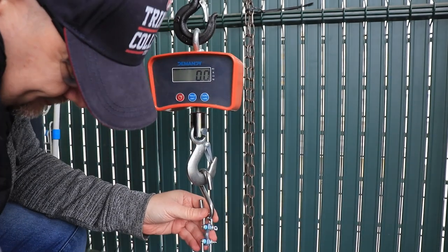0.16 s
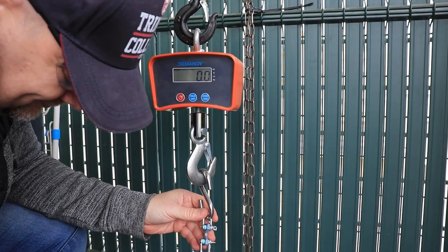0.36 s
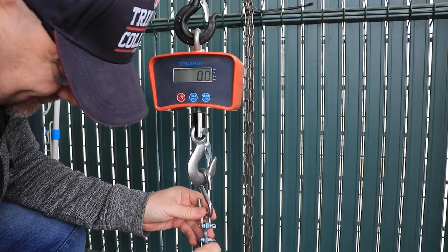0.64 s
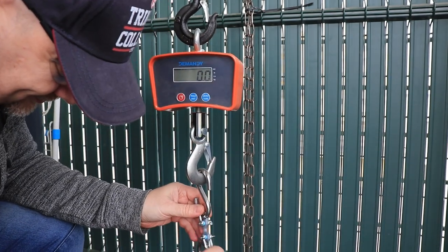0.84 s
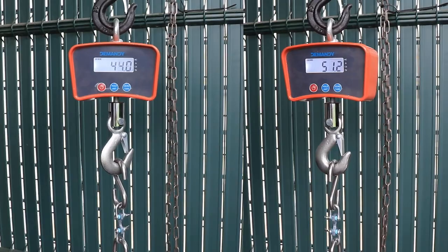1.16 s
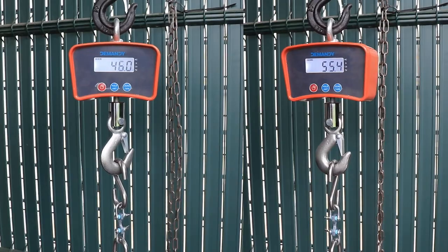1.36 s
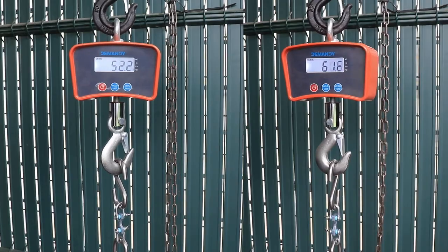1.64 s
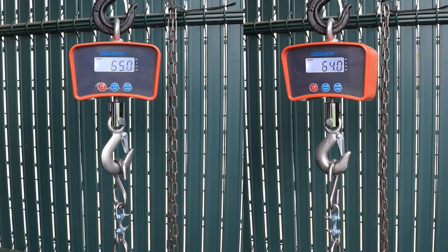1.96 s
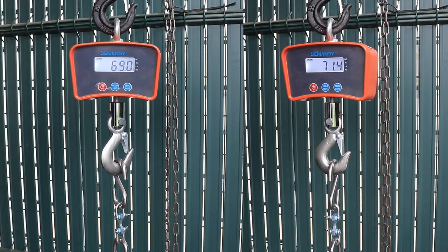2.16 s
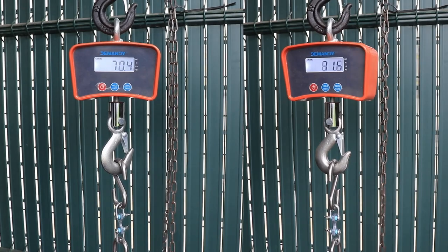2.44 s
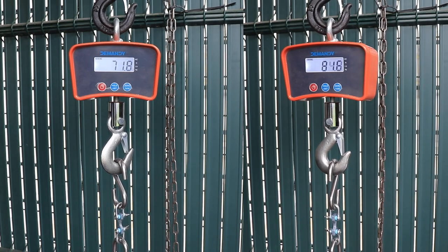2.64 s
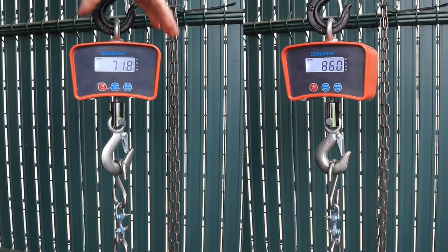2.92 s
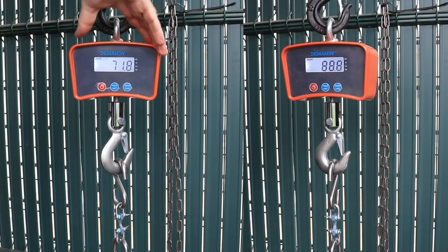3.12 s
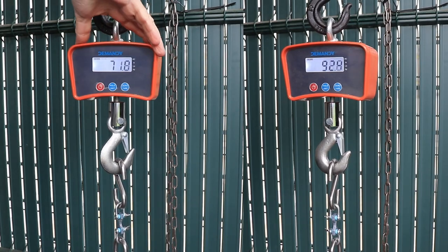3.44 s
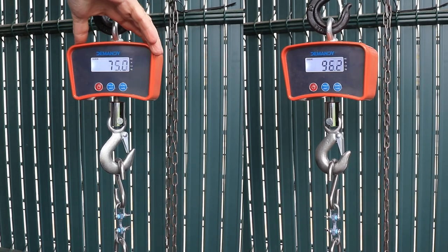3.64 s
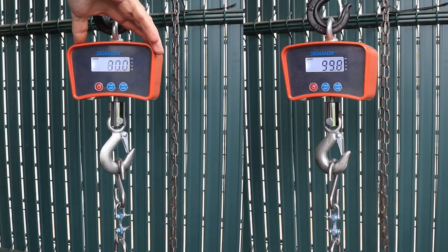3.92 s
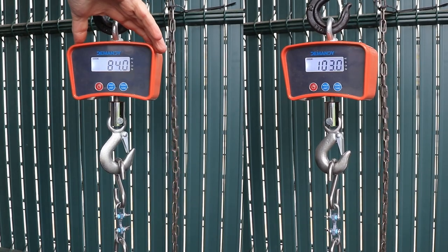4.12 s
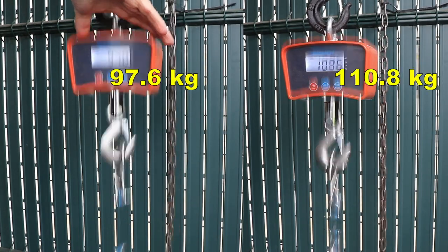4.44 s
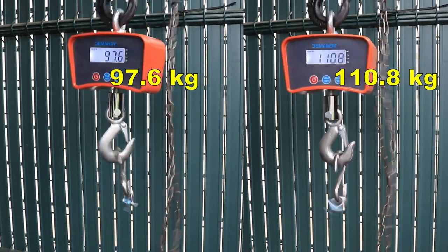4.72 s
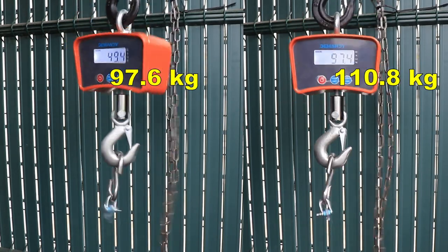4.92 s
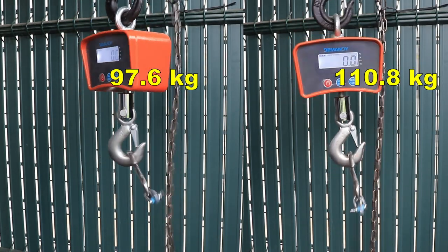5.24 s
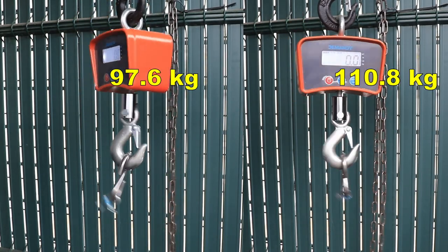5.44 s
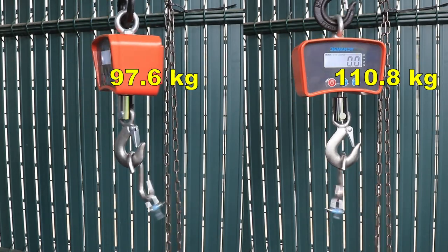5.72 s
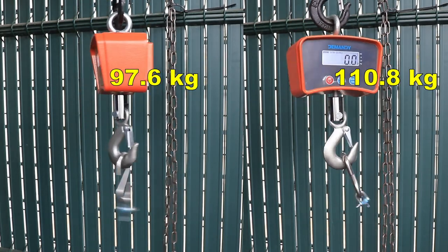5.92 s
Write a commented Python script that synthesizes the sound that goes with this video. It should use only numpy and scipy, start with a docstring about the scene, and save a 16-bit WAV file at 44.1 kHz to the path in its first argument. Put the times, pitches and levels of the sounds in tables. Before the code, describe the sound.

Outdoors, a steel hook clinks lightly in a close hush with one low gust of wind. Two chain hoists then take up load with uneven ratchet clicks and softly sliding chain. Two plastic pieces snap loudly, almost together. Steel hooks ring, slack chains rattle and clash, and a swinging hook knocks on the hollow plastic case of a hanging scale, dying down to a few light clicks.

```python
"""Two chain hoists, side by side, ratchet up load until their plastic test pieces snap, one just after the other.
Pawls click and hand chains slide; after the breaks steel hooks ring, slack chain rattles and clashes, and
a swinging hook knocks on the hollow plastic case of a scale. Each hoist's crash has its own limiter.
It opens outdoors by a fence, where hands set a hook in a close hush with one gust of wind;
the hoists then work over a faint, distant hush."""
import sys
import numpy as np
from scipy import signal
from scipy.fft import rfft, irfft
from scipy.io import wavfile
from scipy.ndimage import uniform_filter1d, minimum_filter1d

SR = 44100
rng = np.random.default_rng(int(sys.argv[2]) if len(sys.argv) > 2 else 0)


def master_out(mix):
    """Clip the mix to full scale and print it as 16-bit PCM to the path in sys.argv[1]."""
    frames = np.transpose(np.atleast_2d(mix))
    ceiling = np.clip(frames, -1, 1)
    pcm = np.round(ceiling * 32767).astype(np.int16)
    wavfile.write(sys.argv[1], SR, pcm)


N = 267995
T = np.arange(N) / SR

# the two plastic pieces breaking: start_s, level_db
BREAKS = [(4.5345, -13.5), (4.553, -7)]
FIRST_BREAK_S = BREAKS[0][0]
# hook creaking and knocking against the scale's case: start_s, level_db, pitch_hz
CASE_KNOCKS = [(1.408, -35, 885), (2.476, -50, 2920), (2.5333, -41.5, 1050), (2.889, -54, 2820),
               (3.372, -43.5, 2870), (3.651, -46, 2880), (3.787, -37.5, 990), (3.827, -39, 2860),
               (3.8376, -34, 1030), (3.915, -37.5, 970), (4.091, -44, 2970), (4.1056, -38, 2150),
               (4.1454, -34.5, 1580), (4.178, -39.5, 2920), (4.2633, -26.5, 2750), (4.6966, -13, 2820),
               (4.7785, -3.5, 2514), (4.802, -6, 2535), (4.8081, -17.5, 1190), (4.838, -11.5, 2670),
               (4.8533, -18, 2820), (4.916, -13, 2810), (4.9334, -14, 1770), (4.938, -11, 2520),
               (4.962, -16.5, 2730), (4.9766, -11.5, 2810), (5.035, -12, 1426), (5.052, -14, 1382),
               (5.079, -20, 2810), (5.115, -22, 2540), (5.152, -13.5, 2880), (5.168, -11.5, 2525),
               (5.24, -23, 2790), (5.2595, -25.5, 2700), (5.292, -25, 2680), (5.333, -33, 2160),
               (5.37, -17.5, 2575), (5.389, -24, 2550), (5.414, -29.5, 2130), (5.43, -31, 1415),
               (5.44, -31.5, 2300), (5.605, -21, 1410), (5.6433, -34, 1290), (5.763, -41.5, 993),
               (5.987, -39.5, 1434), (6.029, -50, 2500)]
# modes of hoist body and chain, low to high: pitch_hz
HOIST_MODES = [2363, 2622, 3155, 3741, 4118, 4480, 5270, 5782, 6632, 7402, 8317, 8942, 9835, 10450, 10850,
               11840, 12240, 13440, 14710]
# tone of the shaken rig: frequency_hz, level_db
RIG_SPECTRUM = [(29, -74.5), (50, -13.5), (229, -7), (329, -9.5), (461, -6.5), (1330, -8), (2810, -4),
                (5670, -12), (10900, -18), (16000, -18.5)]


def amp(db):
    return 10 ** (np.asarray(db) / 20)


def unit_rms(x):
    return x / np.sqrt(np.mean(x ** 2) + 1e-20)


def fade(t, t60):
    return amp(-60 * t / t60)


def tone(t, hz, phase=0):
    return np.sin(2 * np.pi * hz * t + phase)


def resonate(x, hz, q):
    return signal.lfilter(*signal.iirpeak(hz, q, fs=SR), x)


def colour(x, spectrum):
    """Shape x by a spectrum in dB; unit power gain on white noise."""
    hz = np.arange(len(x) // 2 + 1) * SR / len(x) + 1
    points_hz, points_db = np.array(spectrum).T
    gain = amp(np.interp(np.log(hz), np.log(points_hz), points_db))
    return irfft(rfft(x) * unit_rms(gain), len(x))


def split(x, hz):
    """Low and high band of x."""
    return [signal.sosfilt(signal.butter(4, hz, kind, fs=SR, output="sos"), x) for kind in ("low", "high")]


def add(out, start_s, sound):
    at = round(start_s * SR)
    out[at:at + len(sound)] += sound[:N - at]


def drift(per_s):
    """Glide between random values, per_s of them a second."""
    points = rng.standard_normal(int(N / SR * per_s) + 2)
    return np.interp(T * per_s, np.arange(len(points)), points)


def contacts(samples, per_s, t60):
    """Envelope of uneven short touches at random moments."""
    hits = (rng.random(samples) < per_s / SR) * amp(4.5 * np.minimum(rng.exponential(1, samples), 4))
    return signal.lfilter([1], [1, -fade(1 / SR, t60)], hits + 1e-18)


def swell_db(top_s, hold_s, top_db, rise, fall):
    """Level that climbs, holds, then sinks; rise and fall in dB per second."""
    return top_db - rise * np.maximum(top_s - T, 0) - fall * np.maximum(T - top_s - hold_s, 0)


def limiter(x, ceiling=0.145):
    """Duck the gain for about a millisecond around each peak over the ceiling."""
    room = np.minimum(1, ceiling / (np.abs(x) + 1e-9))
    return x * uniform_filter1d(minimum_filter1d(room, 25), 13)


def air():
    """A close hush with one low, thumping gust gives way to a distant hush with a faint wavering hum."""
    # tone of the close and the distant hush: frequency_hz, level_db
    near_spectrum = [(24, -39), (40, -14.5), (124, -17), (600, -18.5), (990, -16.5), (7540, -42),
                     (16000, -45.5)]
    far_spectrum = [(24, 4), (40, -5), (226, -1), (680, -3.5), (965, 1), (2100, -12.5), (4460, -17),
                    (5580, -26), (14800, -34), (16000, -16)]
    near_until_s = 0.952
    white = rng.standard_normal((2, N))
    gust_db = swell_db(top_s=0.58, hold_s=0, top_db=-42, rise=36, fall=75)
    wind = unit_rms(signal.sosfilt(signal.butter(3, [12, 45], "band", fs=SR, output="sos"), white[1]))
    wind *= amp(np.maximum(-53.5, gust_db) + 3 * drift(12))
    near = amp(-47.5) * colour(white[0], near_spectrum) + wind
    hum = amp(-14.5) * unit_rms(resonate(white[1], hz=943, q=18))
    far = amp(-61 + 0.72 * drift(3.04)) * (colour(white[0], far_spectrum) + hum)
    return np.where(T < near_until_s, near, far)


def hand_pull():
    """Strength of the hand on the chain, until the first break."""
    # pulls on the hand chain: top_s, hold_s, level_db
    pulls = [(0, 0.19, -56.5), (.65, 0.15, -60.5), (1.3, 0.87, -65), (3.85, 0.018, -59), (4.22, .35, -62.5)]
    return (T < FIRST_BREAK_S) * sum(amp(swell_db(*pull, rise=132, fall=55)) for pull in pulls)


def chain_slide():
    """Links rub in dense small touches that sound the lower resonances of the hoist."""
    friction = (0.73 + contacts(N, per_s=257, t60=0.098)) * rng.standard_normal(N)
    rub = split(split(friction, 4600)[0], 880)[1]
    rings = sum(resonate(rub, hz, q=45) for hz in (2500, 2810, 2750, 4200, 4340))
    return hand_pull() * unit_rms(rub + 2.6 * rings)


def link_jingle():
    """The sliding chain and single jolts set small links jingling near the top of hearing."""
    # jolts to the links: start_s, level_db
    jolts = [(2.538, -56), (3.834, -48), (3.8694, -51), (4.15, -49), (4.363, -62), (5.0714, -42),
             (5.101, -34), (5.1388, -41), (5.178, -39), (5.285, -50), (5.345, -50), (5.5114, -49),
             (5.6, -65), (5.6466, -61)]
    # three close modes of the links: pitch_hz
    modes = [15300, 15600, 15750]
    t = T[:SR // 3]
    drive = amp(5 + 6 * drift(14)) * hand_pull() * rng.standard_normal(N)
    for start_s, db in jolts:
        add(drive, start_s, amp(db + 27.5) * fade(t, 0.14) * rng.standard_normal(len(t)))
    return sum(resonate(resonate(drive + 1e-18, hz, q=230), hz, q=230) for hz in modes)


def ratchet():
    """The pawl drops and links seat: a scrape, a crunch of quick touches, a shiver of the hoist body."""
    # pawl dropping into the ratchet: start_s, level_db
    pawl_drops = [(1.0973, -34.5), (1.1519, -33), (1.4363, -33.5), (1.6461, -34.5), (1.8639, -36),
                  (1.964, -35), (2.6145, -35.5), (3.3950, -35.5), (3.5656, -35), (3.8582, -35.5),
                  (3.9402, -36), (4.3250, -34.5), (4.4564, -36.5)]
    # links and hooks seating on each other, duller than the pawl: start_s, level_db, pitch_hz, treble_db
    seatings = [(0.005, -43, 2690, -44), (0.135, -47.5, 2680, -64), (0.148, -42, 2930, -50),
                (0.159, -40, 2770, -47), (0.765, -46, 3750, -35), (0.795, -48.5, 3740, -42),
                (0.8195, -41.5, 4600, -18), (1.061, -46.5, 2430, -21), (1.367, -49, 2130, -16),
                (1.408, -38.5, 1820, -13), (1.5205, -46.5, 4210, -59), (1.5737, -46.5, 4100, -17),
                (1.6303, -39.5, 2590, -21), (1.751, -50.5, 4300, -21), (1.787, -34.5, 2650, -28),
                (2.2588, -49.5, 2690, -24), (3.0755, -40, 4550, -25), (3.1847, -39, 3110, -19),
                (4.2, -40, 4200, -16), (4.397, -47.5, 3040, -34), (5.5575, -44, 3400, -20),
                (5.7266, -49, 4500, -19), (5.754, -51.5, 7450, -18), (5.854, -45.5, 4100, -18),
                (5.867, -47.5, 7540, -17), (6.05, -45.5, 3040, -18), (6.061, -39, 1490, -28)]
    # tone of the struck hoist body: frequency_hz, level_db
    body_spectrum = [(350, -24), (600, -6.5), (1830, 1), (2400, -0.5), (3940, 0.5), (5400, -3),
                     (7730, -15.5), (12000, -6.5), (16000, -14)]
    pawl_hz, pawl_low_hz, pawl_treble_db, scrape_s = 4300, 2650, 1, 0.0065
    out, t = np.zeros(N), T[:SR // 4]
    scrape_rise = np.sqrt(t[t < scrape_s] / scrape_s)
    clicks = [(start_s, db, pawl_hz, pawl_treble_db) for start_s, db in pawl_drops]
    for start_s, db, hz, treble_db in clicks + seatings:
        # duller touches start softer and ring clearer
        attack = (1 - fade(t, 0.0024 + 0.00011 * abs(treble_db))) * (t < t[-1] - 0.02)
        ring = amp(7.5 - 0.2 * treble_db) * fade(t, 0.052) * tone(t, hz)
        crunch = 1 + 0.33 * contacts(len(t), per_s=100, t60=0.084)
        envelope = 1.48 * fade(t, 0.048) + amp(-8.5) * fade(t, 0.23) * crunch
        shiver = np.zeros(len(t))
        for mode_hz in [*HOIST_MODES, *rng.uniform(2000, 15500, size=30)]:   # main and lesser modes
            strength = amp(rng.normal(3 * (mode_hz in HOIST_MODES), 3))
            t60 = rng.uniform(0.4, 1.3) * 9.5 / np.sqrt(mode_hz)
            shiver += strength * fade(t, t60) * tone(t, mode_hz, 2 * np.pi * rng.random())
        chatter = 1 + 0.4 * unit_rms(uniform_filter1d(rng.standard_normal(len(t)), 130))
        struck = envelope * rng.standard_normal(len(t)) + amp(-14) * chatter * shiver
        low, high = split(colour(struck, body_spectrum), 7150)
        treble = amp(treble_db + 8.5) * fade(t, 0.63) * high
        ring += (hz == pawl_hz) * amp(rng.normal(3, 2.5)) * fade(t, 0.045) * tone(t, pawl_low_hz)
        add(out, start_s, amp(db - 14) * attack * (low + treble + ring))
        scrape = scrape_rise * split(low[:len(scrape_rise)], 2000)[1]
        add(out, max(start_s - scrape_s, 0), amp(db - 21) * scrape)
    return out


def lone_rings():
    """A link pings under load; later the hollow case booms and the shackle sings as the scale swings."""
    # soft-edged single tones: start_s, level_db, pitch_hz, t60_s
    rings = [(1.168, -31, 3750, 0.092), (4.80, -39, 213.8, 0.78), (4.829, -24, 6650, 0.15),
             (4.87, -41.5, 458, 1.13), (5.17, -51.5, 225.4, 0.6), (5.567, -44.5, 468, 0.2)]
    out, t = np.zeros(N), T[:SR // 2]
    for start_s, db, hz, t60 in rings:
        add(out, start_s, amp(db) * (1 - fade(t, 0.044)) * fade(t, t60) * tone(t, hz))
    return out


def case_knocks():
    """Hook on hollow plastic: a hard tick, a buzzing ring with a few side modes, and a dull tail."""
    loaded_t60_s, free_t60_s = 0.02, 0.043
    taps_from_s, taps_span_s, taps_per_s = 4.78, 0.69, 30
    out, t = np.zeros(N), T[:SR // 5]
    # between the loud knocks the swinging hook keeps tapping, ever softer
    chance = rng.random((round(taps_per_s * taps_span_s), 3))
    taps = [(taps_from_s + late_s, -21 - 10 * late_s - 8 * soft, 2000 + 1100 * pitch)
            for late_s, soft, pitch in chance * [taps_span_s, 1, 1]]
    attack = 1 - fade(t, 0.0006)
    for start_s, db, hz in CASE_KNOCKS + taps:
        treble_db = -36 + 12 * np.log2(hz / 2700) + rng.normal(0, 4)   # lower knocks are duller
        buzz = 5.3 * uniform_filter1d(rng.standard_normal(len(t)), 90)
        ring = fade(t, loaded_t60_s if start_s < FIRST_BREAK_S else free_t60_s) * tone(t, hz, buzz)
        side_modes = amp(-16) * fade(t, 0.03) * sum(tone(t, f) for f in rng.uniform(900, 4200, 5))
        low, high = split(rng.standard_normal(len(t)), 4540)
        tick = amp(-1.5) * fade(t, 0.008) * low + amp(treble_db) * fade(t, 0.015) * high
        tail = amp(-15) * fade(t, 0.17) * colour(low, RIG_SPECTRUM)
        knock = attack * (ring + side_modes + tick + tail)
        add(out, start_s, amp(db - 3.5) * split(knock, 640)[1])
    return out


def link_clashes():
    """Swinging links collide: a short bright burst with the chain's high modes in it."""
    # collisions: start_s, level_db, pitch_hz
    clashes = [(4.829, -23, 6550), (4.873, -26, 12000), (4.9334, -32, 10150), (4.965, -26.5, 7500),
               (5.035, -34, 6700), (5.088, -33.5, 10200), (5.151, -26, 8800), (5.167, -22, 7800),
               (5.267, -31, 12800), (5.3726, -27.5, 13200)]
    out, t = np.zeros(N), T[:SR // 8]
    envelope = (1 - fade(t, 0.0022)) * fade(t, 0.047)
    for start_s, db, pitch_hz in clashes:
        modes = sum(amp(rng.normal(-19, 5)) * tone(t, hz) for hz in HOIST_MODES[6:])
        burst = split(rng.standard_normal(len(t)), 5800)[1]
        ping = 1.56 * fade(t, 0.048) * tone(t, pitch_hz)
        add(out, start_s, amp(db - 7.5) * envelope * (burst + modes + ping))
    return out


def chain_rattle(start_s):
    """Uneven link contacts over a steadier shiver of the frame ping the chain's modes, then settle."""
    top_s = 4.619
    low_db = swell_db(top_s, hold_s=0, top_db=-29, rise=66, fall=32)
    high_db = swell_db(top_s, hold_s=0, top_db=-29.5, rise=0, fall=47)
    shaking = 0.55 + 2.6 * np.sqrt(contacts(N, per_s=120, t60=0.012))
    low, high = split(colour(shaking * rng.standard_normal(N), RIG_SPECTRUM), 5000)
    low_pings = sum(amp(3.5 * drift(25)) * resonate(low, hz, q=35) for hz in HOIST_MODES[:6])
    high_pings = sum(amp(3.5 * drift(25)) * resonate(high, hz, q=120) for hz in HOIST_MODES[6:])
    clatter = amp(low_db) * unit_rms(low + 1.6 * low_pings)
    sizzle = amp(high_db) * unit_rms(high + 1.5 * high_pings)
    return (T > start_s) * (clatter + sizzle)


def steel_ring(part):
    """Each blow stops a steel part and starts it anew; loose contact makes every mode waver."""
    # ringing modes of each steel part: pitch_hz, level_db, t60_s
    hook = [(4441, 0, .3), (4221, -15, .2), (4620, -17, .3), (5572, -15, .2), (3892, -16, .3)]
    shackle = [(3671, 0, .4), (1433, -15, .6), (6607, -15, .5)]
    link = [(12679, 0, .3), (14930, -8, .3)]
    eye = [(6745, 0, .4), (8382, -1, .4), (10228, -4, .5)]
    frame = [(2385, -1, .2), (3030, 0, .2), (2130, -3, .2)]
    # first blows after the breaks; a weak one all but mutes the part: start_s, part, level_db
    strikes = [(4.5341, "hook", -8.5), (4.553, "second hook", -10.5), (4.583, "second hook", -26),
               (4.556, "shackle", -13.5), (4.558, "link", -16.5), (4.556, "frame", -24),
               (4.561, "eye", -21), (4.58, "frame", -21), (4.59, "eye", -24.5), (4.6026, "hook", -14),
               (4.602, "shackle", -19), (4.625, "eye", -36), (4.631, "shackle", -3), (4.635, "link", -14),
               (4.6694, "hook", -43), (4.669, "shackle", -27.5), (4.6694, "link", -44),
               (4.694, "eye", -23.5), (4.6947, "hook", -21), (4.6944, "shackle", -12.5),
               (4.6944, "frame", -26.5), (4.716, "link", -18), (4.72, "shackle", -13.5),
               (4.742, "eye", -29), (4.747, "shackle", -31), (4.757, "link", -42),
               (4.774, "shackle", -25.5), (4.779, "hook", -30.5), (4.83, "hook", -29.5),
               (4.898, "shackle", -41), (5.186, "shackle", -41.5)]
    # parts that case knocks also strike, ever weaker as the swing settles: part, level_db
    swing_db = {"hook": -36.5, "shackle": -42, "link": -45, "eye": -46.5}
    swing_from_s, swing_until_s, swing_db_per_s = 4.86, 5.38, -32
    modes = {"hook": hook, "second hook": hook, "shackle": shackle,
             "link": link, "eye": eye, "frame": frame}[part]
    first = [(s, db) for s, struck, db in strikes if struck == part]
    later = [(s, swing_db[part] + swing_db_per_s * (s - swing_from_s) + rng.normal(0, 4.5))
             for s, _, _ in CASE_KNOCKS if part in swing_db and swing_from_s < s < swing_until_s]
    blow_s, blow_db = np.array(sorted(first + later)).T
    latest = np.maximum(np.searchsorted(blow_s, T) - 1, 0)
    since_s = np.maximum(T - blow_s[latest], 0)
    out = np.zeros(N)
    for k, (hz, db, t60) in enumerate(modes):
        phase = rng.uniform(0, 2 * np.pi, len(blow_s))[latest] + 0.65 * drift(170)
        varies = k > 0 or part in ("eye", "frame")   # these modes depend on where the blow lands
        waver_db = 3 * drift(60) + varies * rng.normal(0, 2.5, len(blow_s))[latest]
        out += amp(blow_db[latest] + db + waver_db) * fade(since_s, t60) * tone(T, hz, phase)
    final_damping = fade(np.maximum(T - blow_s[-1], 0), 0.65)
    return (T > blow_s[0]) * final_damping * out


def plastic_snap(start_s, db):
    """The plastic tears in a wide crack of noise with a darker tail."""
    out, t = np.zeros(N), T[:SR // 2]
    noise = rng.standard_normal(len(t))
    crack = fade(t, 0.05) * split(noise, 490)[1]
    tail = amp(-7) * fade(t, 0.22) * colour(noise, RIG_SPECTRUM)
    add(out, start_s, amp(db) * (crack + tail))
    return out


def scene():
    """Two separately limited crashes over the ratchet, the hand chain and the air, in mono."""
    first = plastic_snap(*BREAKS[0]) + steel_ring("hook") + chain_rattle(FIRST_BREAK_S)
    first += case_knocks() + lone_rings()
    steel = sum(steel_ring(part) for part in ("second hook", "shackle", "link", "eye", "frame"))
    second = plastic_snap(*BREAKS[1]) + steel + chain_rattle(BREAKS[1][0]) + link_clashes()
    return (limiter(first) + limiter(second) + ratchet() + chain_slide() + link_jingle() + air())[None]


def record(dry):
    """A steep low-pass takes off the very top."""
    stop_hz = 16400
    return signal.sosfilt(signal.cheby2(14, 55, stop_hz, fs=SR, output="sos"), dry)


dry = scene()
out = record(dry)
master_out(out)
```